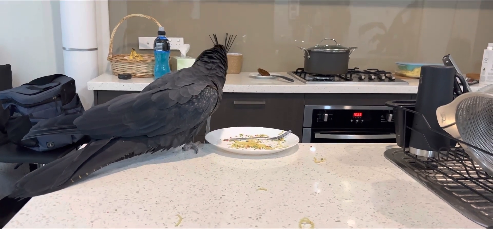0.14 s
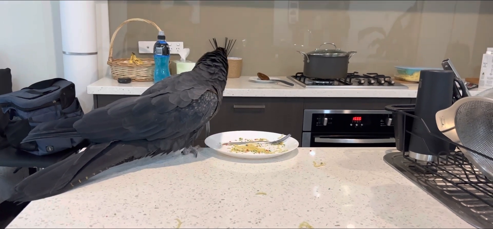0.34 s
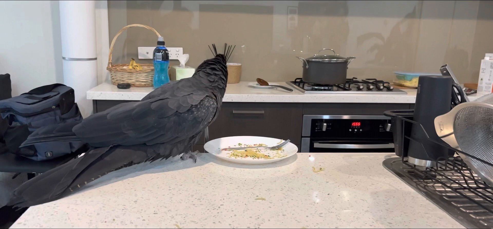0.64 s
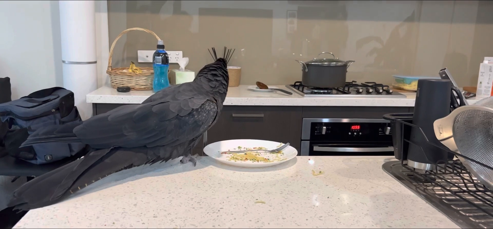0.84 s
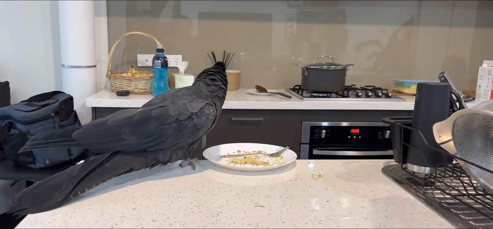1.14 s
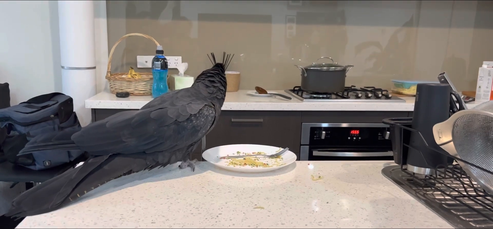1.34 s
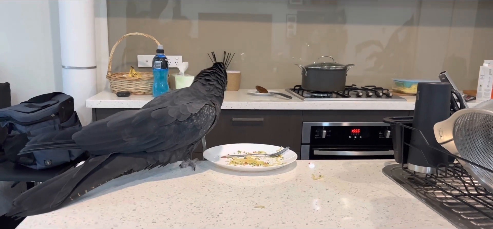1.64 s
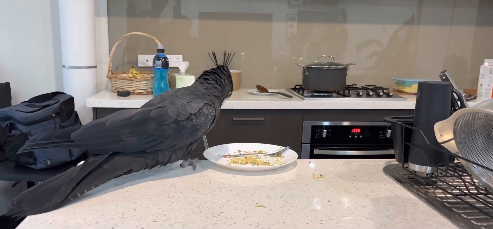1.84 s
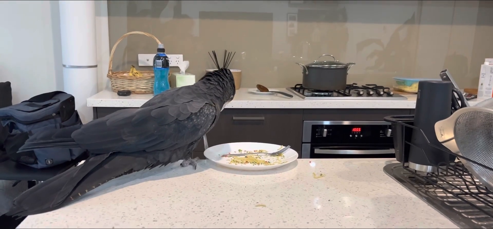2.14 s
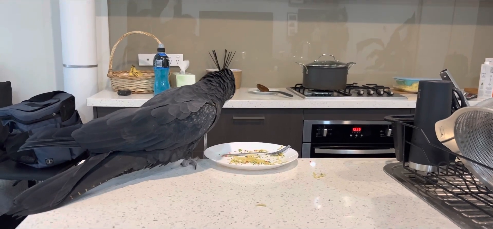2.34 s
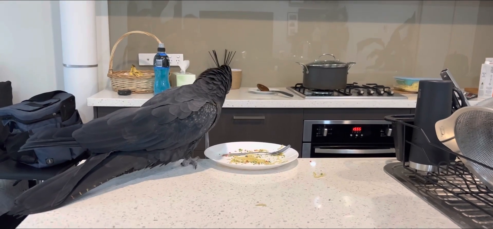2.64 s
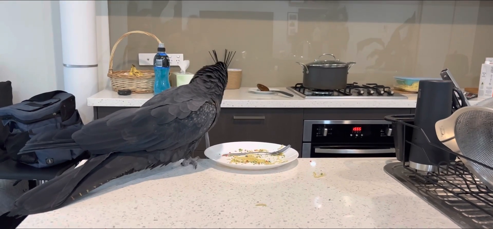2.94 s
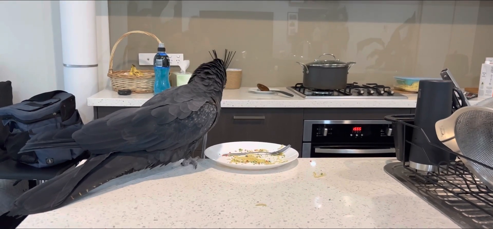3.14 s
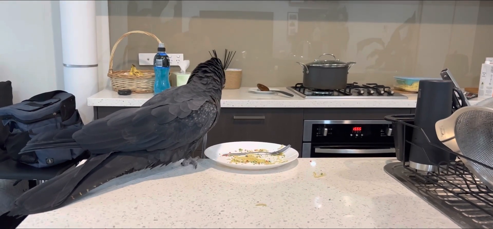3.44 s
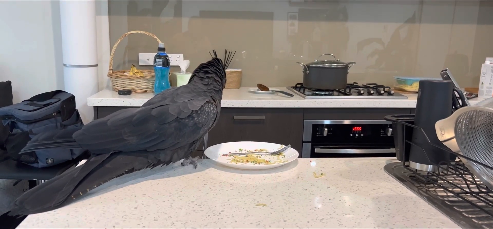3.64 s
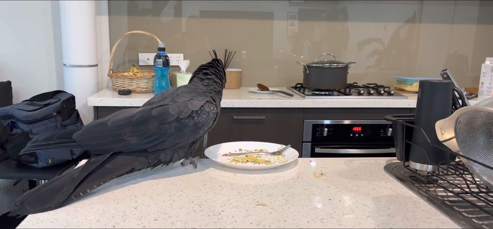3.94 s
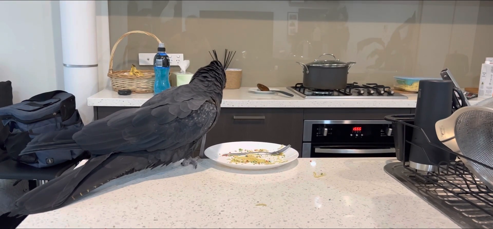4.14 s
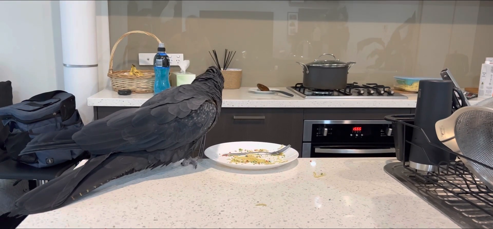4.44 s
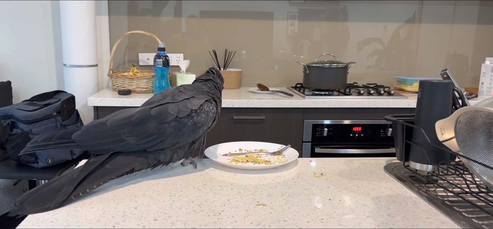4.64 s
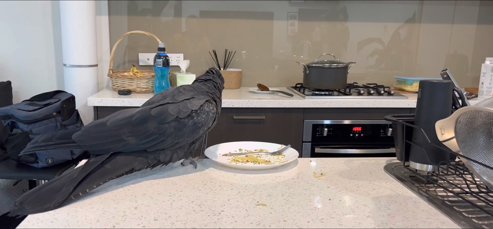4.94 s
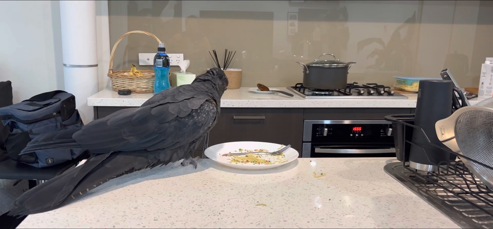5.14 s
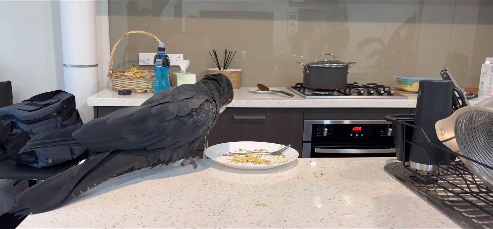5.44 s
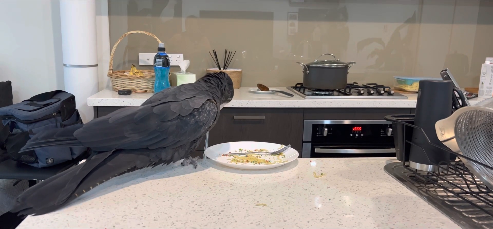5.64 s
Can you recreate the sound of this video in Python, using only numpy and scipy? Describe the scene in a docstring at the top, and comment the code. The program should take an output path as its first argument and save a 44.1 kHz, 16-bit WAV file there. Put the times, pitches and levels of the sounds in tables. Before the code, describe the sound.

Soft thuds and feather rustles mix with ringing fork clinks on a plate, which finally clatters and scrapes across a stone countertop.

```python
"""In a hard-walled kitchen, a large bird shuffles beside a ceramic plate on a stone bench.
A low hum swells over the room's faint hiss. Weight thuds on the bench, feathers rustle, and claws
scuff and tick. A fork strikes the plate and makes it ring, and near the end the plate slides and
grinds on the stone. The room echoes, and a nearby microphone with two ports hears it in stereo."""
import sys
import numpy as np
from scipy import signal
from scipy.fft import rfft, irfft, next_fast_len
from scipy.io import wavfile
from scipy.ndimage import uniform_filter1d

SR = 44100
rng = np.random.default_rng(int(sys.argv[2]) if len(sys.argv) > 2 else 0)


def to_wav(sig):
    """Store sig (one row per channel, or 1-D mono) as 16-bit WAV at the path in sys.argv[1].

    Samples outside -1..1 are clipped; the rate is SR.
    """
    pcm = np.clip(np.atleast_2d(sig), -1, 1) * 32767
    pcm = np.round(pcm).astype(np.int16)
    wavfile.write(sys.argv[1], SR, pcm.T)  # frames by channels


N = 255780

# Levels are relative. A ring_s is the time to fade by 60 dB. A higher tilt is a brighter sound.
# The room's faint hiss: pitch_hz, level_db
AIR_COLOUR = [(15, -19), (25, 10.5), (74, -1), (150, -12), (927, -15), (1360, -15), (3230, -24),
              (6210, -23.5), (9330, -30.5), (10400, -44), (11900, -28), (13600, -44.5), (16500, -34.5)]
# How long the kitchen echoes: pitch_hz, ring_s
ECHO_TIMES = [(100, 0.093), (300, 0.51), (1000, 0.57), (3000, 0.57), (6000, 0.48), (9000, 0.35),
              (14000, 0.087)]
# How alike the room sounds on the left and right: pitch_hz, likeness (0 to 1)
STEREO_LIKENESS = [(60, 0.7), (130, 0.6), (250, 0.4), (700, 0), (2000, 0), (5000, 0), (12000, 0)]
# The hum and the rumble under it: time_s, pitch_hz, hum_db, rumble_db
HUM_PATH = [(0.0, 75, -77.5, -73), (0.2, 71.3, -73.5, -74), (0.28, 61.7, -43.5, -67),
            (0.42, 75.1, -82, -60), (0.6, 72.4, -72, -78.5), (1.0, 64.5, -61, -78),
            (1.24, 62.2, -55.5, -58), (1.5, 58.7, -60, -65), (1.7, 64.3, -71.5, -72),
            (1.95, 60.8, -59, -65.5), (2.12, 60.5, -91, -83.5), (2.75, 59.1, -103, -71.5),
            (3.05, 59, -62.5, -76.5), (3.39, 58.4, -63, -73), (3.68, 58.4, -51.5, -74),
            (4.1, 59.47, -48.5, -65), (4.65, 56.9, -50.5, -68), (4.75, 54, -72, -66.5),
            (4.85, 48, -57, -72), (5.06, 48.7, -80, -64.5), (5.22, 49, -70, -63), (5.65, 58.8, -84, -85),
            (5.8, 71, -73, -97)]
# Weight landing on the bench: start_s, level_db, jolt_s, tilt_db_per_octave
BENCH_THUDS = [(0.225, -29, 0.019, 5), (0.257, -35, 0.0084, 3.5), (0.289, -34, 0.012, 5.5),
               (0.928, -46.5, 0.018, -23), (1.174, -37, 0.046, -8.5), (1.218, -53, 0.032, 13),
               (1.379, -47, 0.011, -5.5), (1.772, -54.5, 0.03, 20.5), (1.898, -65, 0.034, -12),
               (2.593, -71, 0.06, 8), (5.094, -55, 0.0074, 7), (5.17, -52, 0.048, 0.5),
               (5.329, -52, 0.057, 7), (5.417, -64, 0.043, -1), (5.527, -53, 0.063, 12)]
# The bench's natural tones: pitch_hz, width_hz, level_db
BENCH_TONES = [(89, 21, 8.5), (138, 29, 8.5), (210.8, 50, -1), (267.4, 32, -1.5), (386.2, 11, -13),
               (447, 47, -20.5)]
# Slow rustles of feathers: start_s, rise_s, hold_s, hiss_db, drag_db
FEATHER_STROKES = [(0.35, 0.084, 0.038, -64.5, -99), (0.63, 0.019, 0.032, -88, -89),
                   (1.03, .015, .02, -90, -79.5), (1.2, 0.03, 0.057, -77, -56),
                   (1.35, 0.013, 0.19, -76, -55), (1.61, 0.045, 0.15, -69, -53),
                   (2.15, 0.017, 0.16, -74.5, -85.5), (2.4, 0.017, 0.029, -89, -93),
                   (2.48, 0.0055, 0.27, -63, -72), (2.86, 0.037, 0.013, -63.5, -88),
                   (2.96, 0.043, .11, -59, -83), (3.11, 0.017, 0.017, -54.5, -60),
                   (3.33, 0.051, 0.12, -71, -86), (3.57, 0.024, 0.067, -66.5, -68),
                   (3.8, 0.027, 0.24, -79.5, -85.5), (4.08, 0.057, 0.015, -69.5, -70.5),
                   (4.24, 0.039, 0.044, -71, -79.5), (4.39, 0.0071, 0.049, -87.5, -65.5),
                   (4.6, 0.12, 0.096, -80.5, -71.5), (4.8, 0.043, 0.14, -73, -69)]
# The fine hiss of feathers and feet: pitch_hz, level_db
HISS_COLOUR = [(180, -17.5), (300, -24), (1410, -5), (1930, -3), (3240, -9), (6000, -1.5), (9550, -13.5),
               (10400, -54.5), (11500, -14.5), (13800, -22), (16000, -28.5)]
# The duller drag of feathers: pitch_hz, level_db
DRAG_COLOUR = [(88, 5.5), (150, -8.5), (249, -2), (403, 4), (617, -1), (708, 3.5), (1640, -13.5),
               (2760, -10), (4000, -27), (5200, -58), (8800, -120)]
# Quick scuffs of feet and feathers: start_s, level_db, fade_s, tilt_db_per_octave (used down to -4)
BIRD_SCUFFS = [(2.4075, -46.5, 0.0062, -13), (2.9843, -50, 0.023, -2), (3.114, -32, 0.012, 2),
               (3.372, -52.5, 0.021, -3), (3.5745, -48, 0.029, 2), (3.6073, -49, 0.024, 5),
               (4.26, -53.5, 0.026, -1.5), (4.427, -54.5, 0.017, 6)]
# Claws and the plate's foot tapping stone: start_s, level_db, pitch_hz, edge_db, ring_s (capped)
STONE_TAPS = [(0.798, -58.5, 474, 3.5, 0.04), (1.059, -68, 450, 2, 0.025), (1.148, -67.5, 489.5, 2, 0.044),
              (1.233, -53.5, 550, -2, 0.054), (1.39, -48.5, 386, 2.5, 0.023), (1.524, -58, 582, -20, 0.015),
              (1.771, -34, 454, 7.5, 0.04), (2.49, -72.5, 553, 29, 0.04), (2.599, -64.5, 440, 37.5, 0.04),
              (4.608, -56, 464, -23, 0.041), (4.638, -53.5, 428, -21, 0.04), (4.67, -52, 456, -18, 0.056),
              (4.743, -57, 458, -16, 0.054), (4.774, -47, 439, -23, 0.038), (4.888, -48.5, 459, -21, 0.027),
              (4.916, -47.5, 413, -21, 0.025), (4.999, -47.5, 467, -8, 0.04)]
# The plate sliding under the fork: start_s, rise_s, hold_s, grind_db, ring_db
SLIDE_STROKES = [(5.1, 0.029, .01, -72, -59), (5.2, 0.079, 0.023, -60.5, -56.5),
                 (5.3, 0.018, 0.0082, -65, -60), (5.355, 0.022, 0.009, -68, -55),
                 (5.43, 0.03, 0.03, -54.5, -51), (5.54, .03, 0.063, -63, -66),
                 (5.635, 0.0081, 0.023, -63, -63), (5.69, 0.012, 0.099, -56, -52.5)]
# The broad tones of a plate grinding on stone: pitch_hz, width_hz, level_db
GRIND_TONES = [(510, 170, -34), (1077, 66, 4), (2180, 410, 3)]
# The plate's natural tones, of which the second is the main note: pitch_hz
PLATE_PITCHES = [431, 872, 1075, 1348, 1855, 2422, 3060, 3764, 4182, 4270, 4531, 5130, 5398, 5510, 5800,
                 6063, 6319, 6850, 7358, 8080, 8462, 9080, 9618, 9921, 10870, 11658, 12150, 12610, 13540,
                 14789]
# A round plate rings each tone as a close pair, which pulses: level_db, ring_s (capped), pulse_hz
PLATE_TONES = [(-15, 0.19, 2), (-3.5, 0.21, 5.7), (-12.5, 0.37, 28), (-9, 0.45, 9.7), (-4, 0.27, 15),
               (8, 0.068, 11), (-13, 0.6, 16), (-11, 0.53, 4), (-29.5, 0.28, 17), (-26, 0.1, 20),
               (-5, 0.48, 18), (-7.5, 0.17, 10), (-2, 0.66, 15), (-8.5, .12, 66), (-29.5, 0.1, 30),
               (-14, 0.62, 3.5), (-9.5, 0.47, 14), (-26.5, 0.042, 44), (-14.5, 0.74, 14), (-11, .2, 25),
               (-30.5, 0.75, 14), (-19, .25, 76), (-17.5, 0.2, 10), (-21.5, 0.09, 15), (-12, .15, 9),
               (-16.5, 0.23, 26), (-30.5, 0.22, 20), (-21.5, .12, 22), (-38, .12, 30), (-23, 0.21, 14)]
# The noise of the fork touching the plate: pitch_hz, level_db
CRACK_COLOUR = [(150, -11), (400, -9), (1000, 5.5), (2500, -6.5), (5400, 7), (9000, -11.5), (15000, -43)]
# The bright first touch of steel on glaze: pitch_hz, level_db
BITE_COLOUR = [(3000, -42), (7000, 26), (12000, 1), (16000, -22)]
# Fork blows: start_s, level_db, tilt_db_per_octave, crack_db (capped), rise_s,
# ring_length (a factor), low_tones_db, main_note_db
FORK_BLOWS = [(0.038, -46.5, -3.5, -24, 0.00065, 0.71, 9.5, 9), (1.77, -20, 2.5, 1, 0.0012, 1, 8, 5.3),
              (2.599, -23, 1.5, -7, 0.00027, 1, 8, 8), (2.659, -23.5, 2.5, -2, 0.00084, 0.78, 4, 7.5),
              (2.833, -37, -0.5, -7, 0.00093, 0.41, 12, 5),
              (5.029, -24, -1.5, -15, 0.00037, 0.65, -0.5, 11),
              (5.119, -42.5, -4, -2, 0.0043, 1, -3.5, -10),
              (5.299, -30.5, -1.2, 9, 0.00073, 0.55, 0.2, -16.5),
              (5.42, -23, -0.4, -5, 0.0012, 0.4, -2, 4.5),
              (5.474, -26.5, -1.5, -1, 0.0022, 0.58, -14.5, 4.5),
              (5.63, -30, -2, -4, 0.0011, 0.43, -2, -4.5), (5.749, -30, 4.5, 2, 0.00094, 0.68, 3, 4)]
# How much louder the left microphone port is than the right: pitch_hz, left_minus_right_db
PORT_BALANCE = [(60, 0.5), (110, -2.5), (200, -1.5), (380, -1.0), (700, 0), (1290, -2.5), (2380, 2),
                (4400, -7), (8120, -1.5), (15000, 1.5)]

LONGEST_RING_S = 0.5  # the longest time any tone of the plate rings


def gain(db):
    """Turns decibels into a number to multiply a sound by."""
    return 10 ** (np.asarray(db) / 20)


def normalise(x):
    """Scales a sound so that its average strength (rms) is 1."""
    return x / np.sqrt(np.mean(x ** 2) + 1e-20)


def look_up(points, hz):
    """Reads a table at any pitch, blending between its rows."""
    pitches, values = np.transpose(points)
    return np.interp(np.log(hz + 1), np.log(pitches + 1), values)


def add(mix, start_s, sound):
    """Mixes a sound in at its start time."""
    part = mix[round(start_s * SR):][:len(sound)]
    part += sound[:len(part)]


def coloured(x, colour, tilt=0):
    """Shapes a sound's lows and highs by a table, then tilts them around 2 kHz."""
    hz = np.fft.rfftfreq(len(x), 1 / SR)
    shape_db = look_up(colour, hz) + tilt * np.log2(hz / 2000 + 0.06)
    return normalise(irfft(rfft(x) * gain(shape_db), len(x)))


def resonate(x, hz, width_hz):
    """Lets a sound ring at one pitch; a narrower width rings longer."""
    r = np.exp(-np.pi * width_hz / SR)
    push = np.diff(x, prepend=0) * SR / (4 * np.pi * hz)
    return signal.lfilter([1 - r * r], [1, -2 * r * np.cos(2 * np.pi * hz / SR), r * r], push)


def grit(spread_db, grain_samples):
    """Noise whose strength flickers, as many small contacts do."""
    noise = rng.standard_normal(N)
    flicker = normalise(uniform_filter1d(rng.standard_normal(N), grain_samples))
    return noise * gain(spread_db * flicker)


def strokes(rows, column, rise_db, fade_db_per_s):
    """The loudness of a series of strokes: each rises, holds and fades."""
    out, t = np.zeros(N), np.arange(N) / SR
    for row in rows:
        start_s, rise_s, hold_s = row[:3]
        rising_db = np.minimum(rise_db * ((t - start_s) / rise_s - 1), 0)
        faded_db = fade_db_per_s * np.maximum(t - start_s - rise_s - hold_s, 0)
        out += gain(row[column] + np.maximum(rising_db - faded_db, -200))
    return out


def stereo(a, b):
    """Makes left and right from two noises, partly alike in the bass."""
    likeness = look_up(STEREO_LIKENESS, np.fft.rfftfreq(len(a), 1 / SR))
    right = irfft(likeness * rfft(a) + np.sqrt(1 - likeness ** 2) * rfft(b), len(a))
    return np.array([a, right])


def room_air():
    """The faint, steady noise of the room."""
    return gain(-76.5) * stereo(*(coloured(noise, AIR_COLOUR) for noise in rng.standard_normal((2, N))))


def kitchen_echo(x):
    """Hard walls send back a crowd of echoes, each pitch fading at its own speed."""
    hz, t, bands = signal.stft(stereo(*rng.standard_normal((2, SR))), SR, nperseg=256)
    fade = gain(-60 * t / look_up(ECHO_TIMES, hz)[:, None])
    tail = signal.istft(bands * fade, SR, nperseg=256)[1][:, :SR]
    tail *= np.clip(np.arange(SR) / SR / 0.0007 - .5, 0, 1)  # echoes arrive just after the sound
    return signal.fftconvolve(x[None], tail / np.linalg.norm(tail[0]), axes=1)[:, :N]


def low_hum(waver_db=4, waver_hz=10.1, steady_from_s=3.0, steady_to_s=4.7):
    """A low tone with a weak octave, over a rumble; it wavers except during one steady swell."""
    t = np.arange(N) / SR
    times, *columns = np.transpose(HUM_PATH)
    hz, hum_db, rumble_db = (np.interp(t, times, column) for column in columns)
    phase = 2 * np.pi * np.cumsum(hz) / SR
    waver = signal.sosfiltfilt(signal.butter(2, waver_hz, fs=SR, output="sos"), rng.standard_normal(N))
    unsteady = np.clip(np.maximum(steady_from_s - t, t - steady_to_s) / .05, 0, 1)
    level = np.sqrt(2) * gain(hum_db + waver_db * normalise(waver) * unsteady)
    tone = level * (np.sin(phase) + gain(-24.5) * np.sin(2 * phase))
    colour = [(30, -21.5), (70, 9), (130, 0), (260, -7), (500, -17.5), (2000, -63.5)]
    rumble = stereo(*(coloured(grit(3, grain_samples=1500), colour) for _ in "LR"))
    return tone + rumble * gain(rumble_db)


def bench_thuds():
    """A soft push and a short, uneven jolt ring the bench's low tones."""
    out, t = np.zeros(N), np.arange(SR // 2) / SR
    push = 0.89 * np.exp(-((t - .008) / 0.0013) ** 2)
    for start_s, level_db, jolt_s, tilt in BENCH_THUDS:
        jolt = rng.standard_normal(len(t)) * np.exp(-t / jolt_s) * np.minimum(t / 0.0047, 1)
        ring = np.zeros(len(t))
        for hz, width, tone_db in BENCH_TONES:
            tone = resonate(resonate(push + jolt, hz, 3 * width), hz, width)
            ring += gain(tone_db + tilt * np.log2(hz / 135)) * normalise(tone)
        add(out, start_s, gain(level_db) * ring / abs(ring).max())
    return signal.sosfilt(signal.butter(4, 560, fs=SR, output="sos"), out)


def feather_rustle():
    """Moving feathers make a fine hiss and a duller drag, both gritty."""
    hiss_level, drag_level = (strokes(FEATHER_STROKES, column, rise_db=23, fade_db_per_s=142.5)
                              for column in (3, 4))
    hiss = coloured(grit(7, grain_samples=80), HISS_COLOUR)
    drag = coloured(grit(3, grain_samples=300), DRAG_COLOUR)
    return hiss * hiss_level + drag * drag_level


def bird_scuffs():
    """Feet and feathers brush past in sudden bursts of hiss that fade."""
    out, t = np.zeros(N), np.arange(SR // 2) / SR
    for start_s, level_db, fade_s, tilt in BIRD_SCUFFS:
        hiss = coloured(rng.standard_normal(len(t)), HISS_COLOUR, max(tilt, -4))
        shape = np.minimum(t / 0.00067, 1) * np.exp(-t / fade_s)
        add(out, start_s, gain(level_db - 2.5) * hiss * shape)
    return out


def stone_taps(longest_ring_s=0.035):
    """A claw or the plate's foot hits stone: a brief tone, a woody rasp and a sharp edge."""
    out, t = np.zeros(N), np.arange(3000) / SR
    edge_colour = [(300, -16), (2300, 9), (3300, -9.5), (5000, -46.5), (12000, -63)]
    for start_s, level_db, hz, edge_db, ring_s in STONE_TAPS:
        noise = rng.standard_normal(len(t))
        tone = gain(-60 * t / min(ring_s, longest_ring_s)) * np.sin(2 * np.pi * hz * t)
        rasp = gain(-18 - 60 * t / 0.32) * normalise(resonate(resonate(noise, 910, 760), 910, 760))
        edge = gain(edge_db - 60 * t / 0.017) * coloured(noise, edge_colour)
        add(out, start_s, gain(level_db) * (tone + rasp + edge) * np.minimum(t / 0.0016, 1))
    return out


def plate_slide(top_hz=10440):
    """The plate rubs on stone: coarse grit makes it grind, and finer grit makes it ring and hiss."""
    coarse_level, fine_level = (strokes(SLIDE_STROKES, column, rise_db=27, fade_db_per_s=502)
                                for column in (3, 4))
    fine_level *= gain(-16.5)
    coarse = grit(1.8, grain_samples=200) * coarse_level
    fine = grit(4, grain_samples=40) * fine_level
    grind = sum(gain(db) * resonate(coarse, hz, width) * np.sqrt(SR / width / np.pi)
                for hz, width, db in GRIND_TONES)
    ring = np.zeros(N)
    for hz, (db, ring_s, _) in zip(PLATE_PITCHES, PLATE_TONES):
        width = 4 / min(ring_s, LONGEST_RING_S)
        ring += gain(db) * resonate(fine, hz, width) * np.sqrt(SR / width / np.pi)
    hiss = gain(-9) * coloured(grit(5, grain_samples=40), CRACK_COLOUR, tilt=-3) * fine_level
    return signal.sosfilt(signal.butter(4, top_hz, fs=SR, output="sos"), gain(-8.5) * grind + ring + hiss)


def fork_clinks(loudest_crack_db=-2.5):
    """Each blow rings the plate's tones, unevenly by where it lands; the contact cracks and rattles."""
    out, t = np.zeros(N), np.arange(SR * 3 // 4) / SR
    hz = np.array(PLATE_PITCHES)[:, None]
    tone_db, ring_s, pulse_hz = np.transpose(PLATE_TONES)[:, :, None]
    landing_spots = rng.standard_normal((len(FORK_BLOWS), 2, len(hz), 1))
    for blow, (uneven, pulse_shift) in zip(FORK_BLOWS, landing_spots):
        start_s, level_db, tilt, crack_db, rise_s, ring_length, low_tones_db, main_note_db = blow
        boost_db = low_tones_db * (hz < 2200) + main_note_db * (hz == PLATE_PITCHES[1])
        strengths = gain(tone_db + tilt * np.log2(hz / 2000) + boost_db + 1.7 * uneven)
        fade = gain(-60 * t / (ring_length * np.minimum(ring_s, LONGEST_RING_S)))
        pulse = 1 + 1.16 * np.cos(2 * np.pi * pulse_hz * t - 1.6 + 0.46 * pulse_shift)
        ring = (strengths * fade * pulse * np.sin(2 * np.pi * hz * t)).sum(0) / np.linalg.norm(strengths)
        snap, rattle = gain(-60 * t / 0.0086), gain(-6 - 60 * t / (0.42 * ring_length))
        crack = coloured(rng.standard_normal(len(t)), CRACK_COLOUR, tilt)
        crack *= gain(min(crack_db, loudest_crack_db)) * (snap + rattle)
        bite = gain(-24 - 60 * t / 0.004) * coloured(rng.standard_normal(len(t)), BITE_COLOUR)
        rise = np.minimum(t / max(rise_s, .0003), 1)
        add(out, start_s, gain(level_db - 7) * (ring + crack + bite) * rise)
    return out


def scene():
    """Mixes the close sounds with their echo, the hum and the room's air."""
    plate = fork_clinks() + plate_slide()
    taps = stone_taps()
    bird = bird_scuffs() + feather_rustle()
    bench = bench_thuds()
    echo = kitchen_echo(gain(-4) * bird + gain(-3.5) * bench + gain(-5) * plate + gain(-10) * taps)
    return plate + taps + gain(-12.5) * bird + bench + low_hum() + echo + room_air()


def record(dry):
    """The two ports hear each pitch at their own time and level; deep bass and top treble are cut."""
    lead_s, lead_from_hz = 0.000333, 1770  # the treble reaches the left port first
    bass_cut_hz, treble_cut_hz = 40, 16500
    size = next_fast_len(N + 4096)
    hz = np.fft.rfftfreq(size, 1 / SR)
    lead_phase = 2 * np.pi * lead_s * hz ** 3 / (hz ** 2 + lead_from_hz ** 2)
    left = gain(look_up(PORT_BALANCE, hz) / 2) * np.exp(.5j * lead_phase)
    right = 1 / left
    bass_cut = (1j * hz / (bass_cut_hz + 1j * hz)) ** 2
    ports = irfft(rfft(dry, size) * bass_cut * np.array([left, right]), size)[:, :N]
    treble_cut = signal.firwin(511, treble_cut_hz, window=("kaiser", 9), fs=SR)
    return signal.oaconvolve(ports, treble_cut[None], "same")


dry = scene()
out = record(dry)
to_wav(out)
```